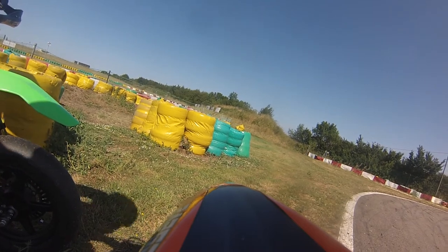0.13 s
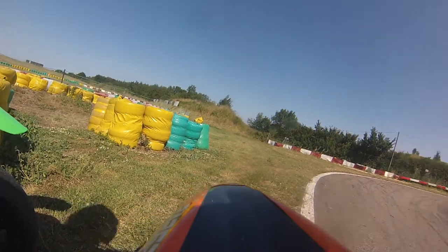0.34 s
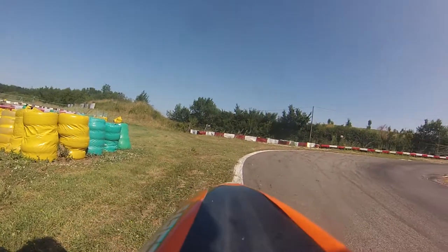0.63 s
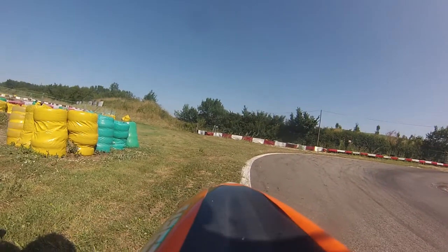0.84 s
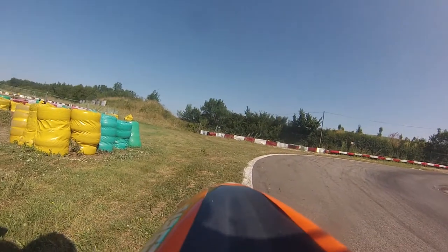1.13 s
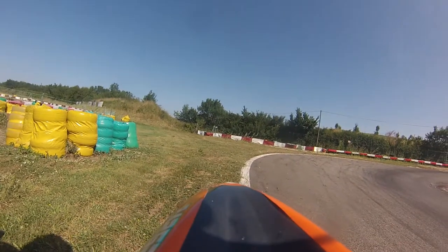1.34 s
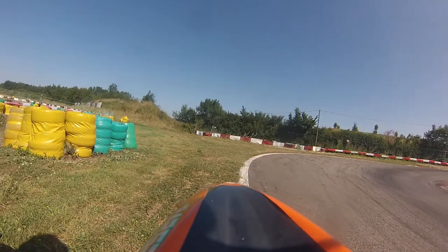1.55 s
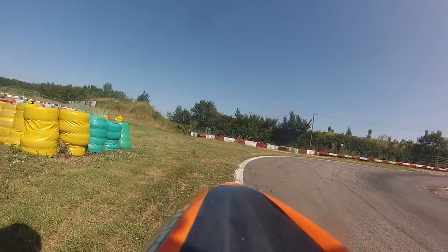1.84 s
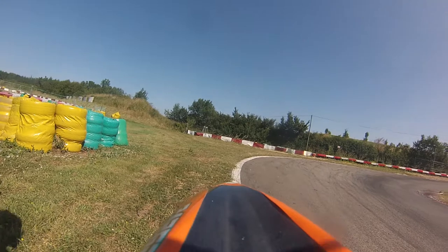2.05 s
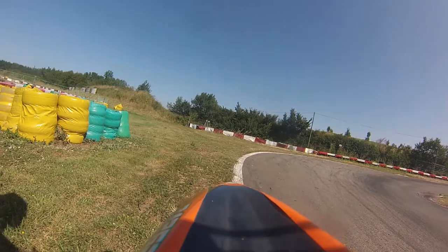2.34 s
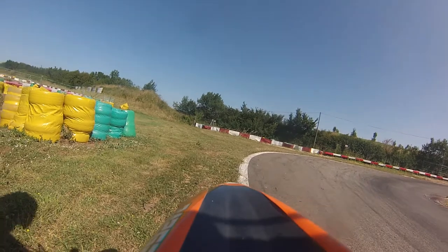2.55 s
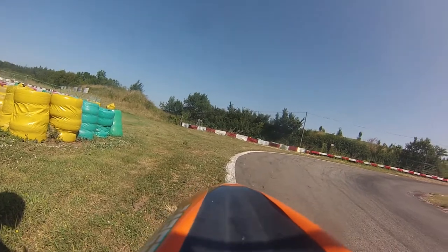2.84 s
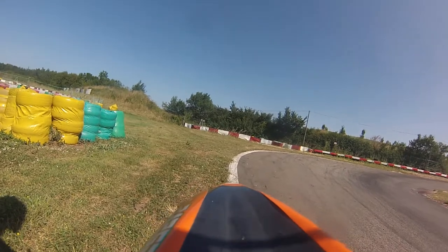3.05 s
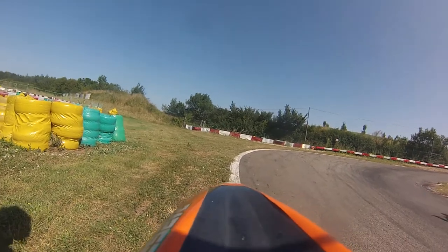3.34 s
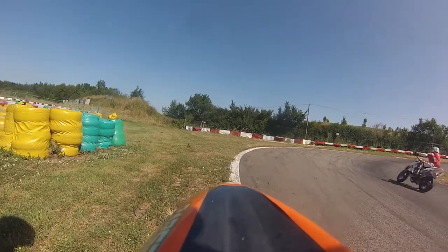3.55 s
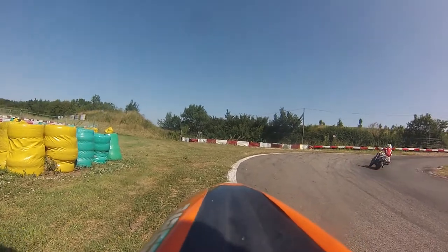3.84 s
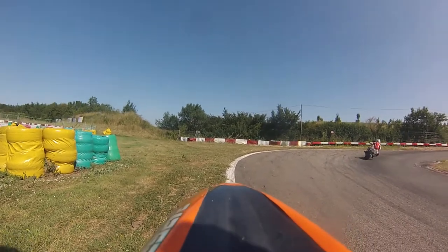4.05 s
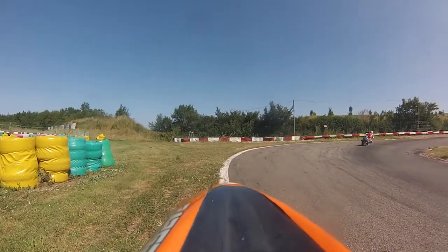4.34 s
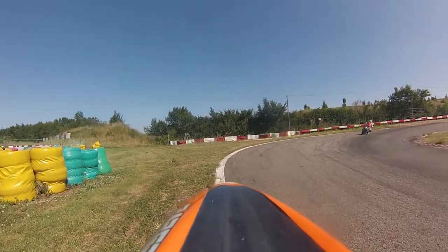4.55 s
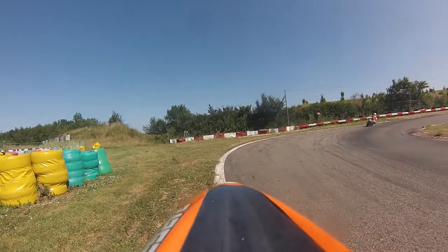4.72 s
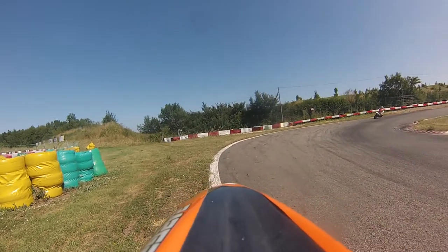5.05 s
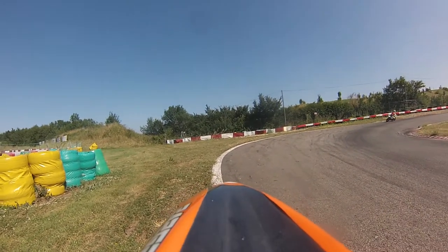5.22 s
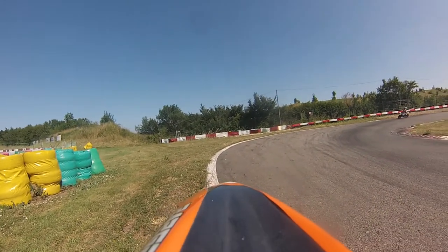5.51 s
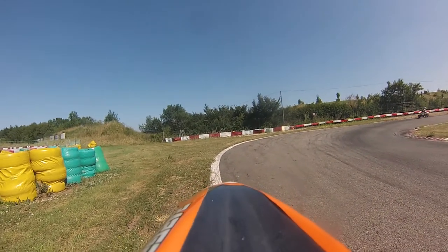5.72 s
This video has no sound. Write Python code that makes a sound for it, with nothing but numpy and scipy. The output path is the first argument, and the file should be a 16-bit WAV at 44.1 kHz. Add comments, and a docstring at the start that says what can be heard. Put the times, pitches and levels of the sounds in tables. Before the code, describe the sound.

A small motorbike starts up, rattling hard, is blipped twice and clunks into gear, after another bike idles faintly alongside.

```python
"""A bike alongside drops back to idle: exhaust pops, silencer rasp, gear and valve clatter.
The rider of a small four-stroke pit bike shifts about with knocks and faint squeaks, starts the
engine at 2.8 s, blips the throttle twice and clunks into gear. All is heard from the bike's frame:
the crank shakes it, and every turn rattles the panels and rings a camera housing mounted on it."""
import sys
import numpy as np
from scipy import signal
from scipy.fft import rfft, irfft
from scipy.io import wavfile
from scipy.ndimage import uniform_filter1d, map_coordinates

SR = 44100
rng = np.random.default_rng(int(sys.argv[2]) if len(sys.argv) > 2 else 0)


def put_to_file(sound):
    """Save the sound as 16-bit audio at rate SR, in the file named by the first command-line argument."""
    columns = np.atleast_2d(sound).T  # one column per channel
    safe = np.clip(columns, -1, 1)
    whole_steps = np.round(safe * 32767)
    wavfile.write(sys.argv[1], SR, whole_steps.astype(np.int16))


N = 259308
TIME_S = np.arange(N) / SR

# Spectra. Each row: frequency in Hz, relative density in dB.
EXHAUST_SPECTRUM = [(30, -38), (60, -19.5), (100, -10), (125, 1.5), (165, -5), (210, -5.5), (300, -1),
                    (380, -15.5), (470, 1), (800, -21.5), (1300, -45)]
GEAR_SPECTRUM = [(500, -19.5), (800, -15.5), (1050, -22.5), (1400, -6.5), (1580, -8.5), (1900, -20),
                 (2280, -7.5), (2550, -13.5), (2750, -26.5), (2980, -17), (3300, -34), (4500, -26),
                 (8500, -41), (11500, -35.5), (15000, -54)]
FRAME_RUMBLE_SPECTRUM = [(15, -20), (25, -1.5), (60, 0), (100, -3.5), (200, -5.5), (270, -24), (400, -24.5),
                         (1200, -74.5)]
SIZZLE_SPECTRUM = [(2300, -16.5), (2700, -0.5), (2980, 10), (3300, -2), (3850, 6), (4500, -4.5), (5600, -9),
                   (7000, -14), (8600, -24.5), (10000, -18), (11500, -27), (15500, -44)]
# Resonances. Each row: frequency in Hz, bandwidth in Hz, relative gain in dB.
EXHAUST_PIPE_MODES = [(111, 30.5, 0)]
SILENCER_MODES = [(2290, 170, 8.5), (2960, 570, 1), (6960, 1400, -8), (10900, 290, -8.5)]
CYLINDER_HEAD_MODES = [(1580, 65, 15.5), (2250, 180, 1), (3100, 54, -16), (3470, 25, 2.5), (4050, 110, -1),
                       (4550, 110, -2.5), (5200, 240, -4), (6950, 130, -4.5), (7540, 290, -8),
                       (8040, 170, -5.5), (9900, 360, -18.5), (10240, 250, -11.5)]
BODY_PANEL_MODES = [(492.6, 72, 3), (837.5, 97, 2), (1033, 69, -1), (1304, 74, 1), (1433, 53, 1),
                    (1900, 350, -1)]
CAMERA_HOUSING_MODES = [(2040, 93, 0.7), (2357, 96.4, 11.55), (2497, 203, 0.5)]
CAMERA_MOUNT_MODES = [(126, 37, 0.45), (210.3, 40.5, 2.7)]
LOOSE_PART_MODES = [(1360, 390, 16.5), (1870, 534, 15.5), (5697, 430, -3.5), (7020, 410, -4),
                    (10230, 281, -9.5), (12500, 3000, -34)]
# Each row: time in seconds, level in dB, decay in seconds.
FRAME_LURCHES = [(.22, -43, 0.25), (1.939, -39, 0.11), (2.17, -49, 0.09), (2.851, -17, .07),
                 (2.96, -18, 0.12), (3.27, -17, 0.068), (4.4, -14.5, 0.036), (5.28, -26.5, .1)]
# Each row: start in seconds, click peak in dB, thud peak in dB.
RIDER_KNOCKS = [(0.72, -50, -70), (1.43, -41.5, -40), (1.517, -43, -70), (1.531, -36, -48),
                (1.916, -35, -26.5), (1.949, -43, -52), (1.99, -42.5, -64), (2.051, -45, -52),
                (2.368, -36, -54), (2.451, -40, -62), (2.5, -35.5, -53), (2.799, -26, -33.5)]
# The last is the gear going in.
# Each row: start in seconds, click peak in dB, thud peak in dB, panel over housing in dB.
DRIVE_JOLTS = [(2.835, -4, -18.5, -11.5), (2.938, -7, -13, -11.5), (2.978, -9, -15, -8),
               (3.325, -8.5, -8, 2.5), (5.246, -11.5, 0.5, 2.5)]
# The camera clacks in its housing. Each row: start in seconds, peak in dB.
HOUSING_CLACKS = [(3.025, -14.5), (3.046, -14), (4.026, -8), (4.965, -10), (5.599, -14), (5.663, -9)]
# Each row: start and length in seconds, edge and top pitch in Hz, peak in dB, waver as a fraction.
SQUEAKS = [(1.387, 0.07, 8400, 8450, -58, 0.028), (2.068, 0.13, 800, 823, -57, 0.084),
           (2.277, 0.11, 1630, 1970, -58, 0.0089)]
# Three pushes as the engine catches, two blips, two as the gear drags it down, one pick-up.
# Each row: start and end in seconds, crank speed reached in Hz.
CRANK_PUSHES = [(2.8, 2.875, 46), (2.92, 3.03, 66.5), (3.1, 3.141, 79), (3.28, 3.43, 161),
                (4.385, 4.509, 144.5), (5.202, 5.281, 61), (5.304, 5.351, 59.5), (5.54, 5.649, 65.2)]
# Each row: crank speed in Hz, then base levels of panels, housing ring and sizzle in dB.
RATTLE_BY_SPEED = [(52, -36, -31.5, -55), (59.9, -37, -29, -55.5), (76.7, -27, -20, -44.5),
                   (81, -30, -21, -47), (102, -30.5, -22, -47.5), (119.7, -28.5, -18.5, -44.5),
                   (150.97, -23, -18, -37.5), (163, -21, -23.5, -38)]
# Parts shift in their seats. Each row: time in seconds, extra rattle in dB.
SEAT_LOOSENESS = [(2.85, 3), (3.25, .5), (3.4, -1), (3.55, 2.5), (3.78, 2.5), (3.92, -1.5), (4.32, 1),
                  (4.42, 0.5), (4.58, -0.5), (4.82, 2.5), (4.95, 1), (5.23, 4)]
# Frame response to crank orders 1 and 2; mount transfer. Each row: frequency in Hz, gain in dB.
FIRST_ORDER_RESPONSE = [(53, -14), (60, -17), (68, -16), (80, -19.5), (105, -29.5), (133, -22), (148, -29),
                        (160, -17.5)]
SECOND_ORDER_RESPONSE = [(106, -38.5), (137, -21), (158, -31), (180, -18), (211, -12.5), (245, -18.5),
                         (280, -15.5), (320, -24)]
MOUNT_RESPONSE = [(25, 1.5), (60, -8.5), (130, -24.5), (210, 4), (270, -9), (340, -14), (430, -6),
                  (600, -29.5), (1000, -5.5), (1500, -12)]
# Half orders come from the firing stroke. Each row: multiple of crank speed, relative level in dB.
WEAK_ORDERS = [(.5, -22.5), (1.5, -11.5), (2.5, -21.5), (3, -10.5), (3.5, -18), (4, -20), (5, -11.5),
               (6, -12.5), (7, -17), (8, -18)]
# Each row: centre in seconds, half width in seconds, relative level in dB.
BUZZ_SPELLS = [(4.008, .015, -26), (4.175, 0.057, -15.5), (4.433, 0.011, -17.5)]


def from_db(db):
    """Decibels to gain."""
    return 10 ** (np.asarray(db) / 20)


def unit_rms(x):
    """Unit power overall."""
    return x / np.sqrt(np.mean(x ** 2) + 1e-20)


def evened(x, span_s=.04):
    """Unit running power, single pulses kept."""
    return x / np.sqrt(np.abs(uniform_filter1d(x * x, int(span_s * SR))) + 1e-16)


def gain_at(points, hz):
    """Gain of a spectrum on a log-frequency axis."""
    points_hz, db = np.transpose(points)
    return from_db(np.interp(np.log(hz + 1e-3), np.log(points_hz), db))


def colour(x, points):
    """Apply a spectrum, rolled off at both ends."""
    hz = np.fft.rfftfreq(2 * N, 1 / SR)
    rolloff = 1 / (1 + (hz / points[-1][0] / 2) ** 4) * hz / (hz + points[0][0] / 2)
    return irfft(rfft(x, 2 * N) * gain_at(points, hz) * rolloff)[:N]


def drift(rate_hz):
    """Smooth noise, unit RMS."""
    knots = rng.standard_normal(N // 20)
    return unit_rms(map_coordinates(knots, [TIME_S * rate_hz], order=3, mode="wrap"))


def resonate(x, modes):
    """Parallel resonators, alternating signs."""
    out = 0
    for k, (hz, width_hz, db) in enumerate(modes):
        r = np.exp(-np.pi * width_hz / SR)
        poles = [1, -2 * r * np.cos(2 * np.pi * hz / SR), r * r]
        band = (1 - r * r) / 2 * signal.lfilter([1, 0, -1], poles, x + 1e-18)
        out = out + (-1) ** k * from_db(db) * band
    return out


def low_pass(x, hz, order):
    """Butterworth low-pass."""
    return signal.sosfilt(signal.butter(order, hz, fs=SR, output="sos"), x)


def housing(x, modes, edge_hz=2560):
    """Resonances heard through the closed case, which shuts out the treble."""
    return low_pass(resonate(x, modes), edge_hz, order=14)


def bursts(cycles, decay_cycles, uneven_db):
    """Envelope: one swell and decay per cycle, random strength."""
    strength = from_db(uneven_db * np.clip(rng.standard_normal(N // 20), -2, 2))
    age = (cycles % 1) / decay_cycles
    return unit_rms(strength[cycles.astype(int)] * (np.exp(-age) - np.exp(-4 * age)))


def ticks(cycles, uneven_db):
    """One impulse per cycle, random strength."""
    impulses = np.diff(np.floor(cycles), prepend=np.floor(cycles[0]))
    return impulses * from_db(uneven_db * rng.standard_normal(N))


def running(rise_s=.019):
    """Ramp from 0 to 1 at the first firing."""
    return np.clip((TIME_S - DRIVE_JOLTS[0][0]) / rise_s, 0, 1)


def bike_alongside(start_hz=55, idle_hz=28.58, settle_s=.96):
    """Firings ring the pipe and silencer, valves tick, gears clatter. All ease as the revs drop."""
    revs = np.maximum(1 - TIME_S / settle_s, 0) ** 1.55
    firing_hz = idle_hz + (start_hz - idle_hz) * revs
    exhaust_db = -54 + 8 * revs ** 2
    clatter_db = -58 + 11 * revs ** .51
    cycles = np.cumsum(firing_hz * (1 + .007 * drift(20))) / SR
    firings = ticks(cycles, uneven_db=.5)
    pops = firings + .007 * rng.standard_normal(N)
    blowdown = (1 + .5 * bursts(cycles, decay_cycles=.3, uneven_db=1)) * rng.standard_normal(N)
    rasp = from_db(-49) * revs * evened(resonate(.62 * unit_rms(firings) + blowdown, SILENCER_MODES))
    exhaust = unit_rms(colour(resonate(pops, EXHAUST_PIPE_MODES), EXHAUST_SPECTRUM))
    mesh = 12 + bursts(cycles + .1, decay_cycles=.15, uneven_db=2)
    gears = unit_rms(colour(mesh * rng.standard_normal(N), GEAR_SPECTRUM))
    seating = sum(bursts(cycles + phase, decay_cycles=.08, uneven_db=1) for phase in (.05, .85))
    valves = evened(resonate((1.9 + seating) * rng.standard_normal(N), CYLINDER_HEAD_MODES), span_s=.052)
    return from_db(exhaust_db) * exhaust + rasp + from_db(clatter_db) * (gears + from_db(-4) * valves)


def frame_rumble(rest_db=-56.5, engine_db=-47, rise_s=.027):
    """The frame rocks under the rider and the running engine; each lurch swells and dies."""
    level = from_db(rest_db) + from_db(engine_db) * running()
    for at_s, db, decay_s in FRAME_LURCHES:
        swell = np.clip(1 + (TIME_S - at_s) / rise_s, 0, 1) ** 2
        level = level + from_db(db) * swell * np.exp(-np.maximum(TIME_S - at_s, 0) / decay_s)
    return level * unit_rms(colour(rng.standard_normal(N), FRAME_RUMBLE_SPECTRUM))


def blow(start_s, click_db, thud_db, panel_db, crunch_s, thud_s, thud_hz=198, crack_db=-16):
    """One impact: a crunch through panels and housing over a thud of the mount."""
    out, age_s = np.zeros(N), TIME_S[:N // 40]
    thud = low_pass(np.sin(2 * np.pi * thud_hz * age_s) * np.exp(-age_s / thud_s), 450, order=2)
    crunch = np.exp(-age_s / crunch_s) * rng.standard_normal(len(age_s))
    crack = from_db(crack_db) * unit_rms(low_pass(crunch, 5400, order=2))
    panel = unit_rms(housing(crunch, BODY_PANEL_MODES)) + crack
    click = unit_rms(housing(crunch, CAMERA_HOUSING_MODES)) + from_db(panel_db) * panel
    at = int(start_s * SR)
    for part, peak_db in (click, click_db), (thud, thud_db):
        out[at:at + len(part)] += from_db(peak_db) * part / np.abs(part).max()
    return out


def knocks():
    """Rider knocks ring the mount, drive jolts push it once, clacks ring mainly the housing."""
    rider = sum(blow(*row, panel_db=-1.5, crunch_s=.0083, thud_s=.023) for row in RIDER_KNOCKS)
    jolts = sum(blow(*row, crunch_s=.005, thud_s=.0046) for row in DRIVE_JOLTS)
    clacks = sum(blow(*row, thud_db=-np.inf, panel_db=-18, crunch_s=.0017, thud_s=1)
                 for row in HOUSING_CLACKS)
    return rider + jolts + clacks


def squeaks():
    """Thin, wavering tones that arch up and down."""
    out = np.zeros(N)
    for start_s, length_s, edge_hz, top_hz, db, waver in SQUEAKS:
        arch = np.sin(np.pi * np.clip((TIME_S - start_s) / length_s, 0, 1))
        hz = (edge_hz + (top_hz - edge_hz) * arch) * (1 + waver * drift(980))
        out += from_db(db) * arch * np.sin(2 * np.pi * np.cumsum(hz) / SR)
    return out


def crank_speed_hz(kick_hz=30, friction_hz_per_s=15, drag_per_s=.86):
    """Each push ramps the crank to a new speed; friction and drag slow it until the next."""
    crank_hz = np.full(N, float(kick_hz))
    offset_hz = friction_hz_per_s / drag_per_s
    for start_s, end_s, reached_hz in CRANK_PUSHES:
        before_hz = np.interp(start_s, TIME_S, crank_hz)
        ramp_hz = np.interp(TIME_S, [start_s, end_s], [before_hz, reached_hz])
        coast_hz = (reached_hz + offset_hz) * np.exp(-drag_per_s * (TIME_S - end_s)) - offset_hz
        crank_hz = np.select([TIME_S < start_s, TIME_S < end_s], [crank_hz, ramp_hz], coast_hz)
    return crank_hz


def rattle_levels_db(crank_hz, pull_db=2.5, full_pull_hz_per_s=390, smooth_s=.015):
    """Panel, ring and sizzle levels follow speed and looseness, and rise under acceleration."""
    points_hz, *columns_db = np.transpose(RATTLE_BY_SPEED)
    pull = np.clip(np.gradient(crank_hz) * SR / full_pull_hz_per_s, 0, 1)
    pull = uniform_filter1d(pull, int(smooth_s * SR))
    extra_db = pull_db * pull + np.interp(TIME_S, *np.transpose(SEAT_LOOSENESS))
    return [np.interp(crank_hz, points_hz, db) + extra_db for db in columns_db]


def rattle(turns, crank_hz, catch_s=2.8, rise_s=.047):
    """Loose parts hit their seats at both ends of the stroke, harder on the firing turn."""
    panel_db, ring_db, sizzle_db = rattle_levels_db(crank_hz)
    stroke = bursts(turns + .8, decay_cycles=.3, uneven_db=2)
    return_stroke = .6 * bursts(turns + .3, decay_cycles=.25, uneven_db=2)
    firing = .32 * bursts(turns / 2 + .4, decay_cycles=.2, uneven_db=2)
    scatter = unit_rms((1.1 + stroke + return_stroke + firing) * rng.standard_normal(N))
    # At high revs the contacts lock to the crank and snarl.
    snarl = .78 * crank_hz / 150 * unit_rms(ticks(turns + .8 + .011 * drift(200), uneven_db=1.8))
    panels = from_db(panel_db - 1) * evened(housing(scatter + snarl, BODY_PANEL_MODES))
    ring = from_db(ring_db + .5) * evened(housing(scatter + snarl, CAMERA_HOUSING_MODES), span_s=.037)
    sizzle = from_db(sizzle_db) * evened(colour(scatter + .16 * snarl, SIZZLE_SPECTRUM))
    # At low revs uneven kicks make the mount boom.
    boom_gain = from_db(-29) * 60 / np.maximum(crank_hz, 60)
    boom = boom_gain * evened(low_pass(resonate(scatter, CAMERA_MOUNT_MODES), 310, order=4))
    caught = np.clip((TIME_S - catch_s) / rise_s, 0, 1)
    return (panels + ring + sizzle) * caught + boom * running()


def frame_shake(turns, crank_hz, weak_trim_db=-21, waver_db=3):
    """The piston shakes the frame once and twice a turn; weaker, unsteady orders grow with speed."""
    angle_rad = 2 * np.pi * turns
    shake = gain_at(FIRST_ORDER_RESPONSE, crank_hz) * np.sin(angle_rad)
    shake += gain_at(SECOND_ORDER_RESPONSE, 2 * crank_hz) * np.cos(2 * angle_rad)
    force = (crank_hz / 120) ** 1.59
    for order, db in WEAK_ORDERS:
        transfer = gain_at(MOUNT_RESPONSE, order * crank_hz)
        gain = force * transfer * from_db(db + weak_trim_db + waver_db * drift(25))
        shake += gain * np.sin(order * angle_rad + rng.uniform(0, 2 * np.pi))
    return np.sqrt(2) * shake * running(rise_s=.15)


def loose_part_buzz(turns, bounce=.63, chatter_trim_db=-9.5, thump_trim_db=-9):
    """In brief spells a loose metal part hits once a turn, bounces and thumps the mount."""
    level = sum(from_db(db) * np.exp(-((TIME_S - centre_s) / half_s) ** 2)
                for centre_s, half_s, db in BUZZ_SPELLS)
    hits = ticks(turns, uneven_db=1.5) + bounce * ticks(turns + .68, uneven_db=2)
    scrape = .23 * bursts(turns, decay_cycles=.04, uneven_db=2) * rng.standard_normal(N)
    chatter = evened(resonate(unit_rms(hits) + scrape, LOOSE_PART_MODES))
    thump = evened(low_pass(resonate(hits, CAMERA_MOUNT_MODES), 360, order=4))
    return level * (from_db(chatter_trim_db) * chatter + from_db(thump_trim_db) * thump)


def scene():
    """Mono mix; one crank drives shake, rattle and buzz."""
    crank_hz = crank_speed_hz()
    turns = np.cumsum(crank_hz * (1 + .003 * drift(40))) / SR
    engine = frame_shake(turns, crank_hz) + rattle(turns, crank_hz) + loose_part_buzz(turns)
    return (engine + bike_alongside() + knocks() + frame_rumble() + squeaks())[None]


def record(dry, stopband_hz=15700):
    """Soft limiter at full scale, then a steep low-pass."""
    limited = dry / (1 + dry ** 8) ** (1 / 8)
    return signal.sosfilt(signal.cheby2(12, 70, stopband_hz, fs=SR, output="sos"), limited)


dry = scene()
out = record(dry)
put_to_file(out)
```